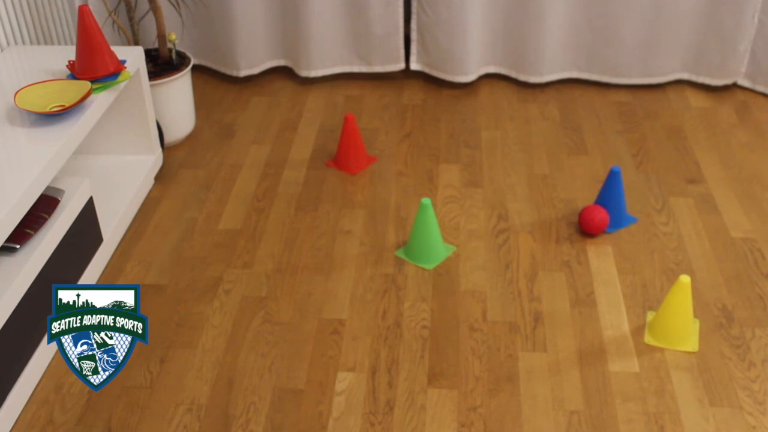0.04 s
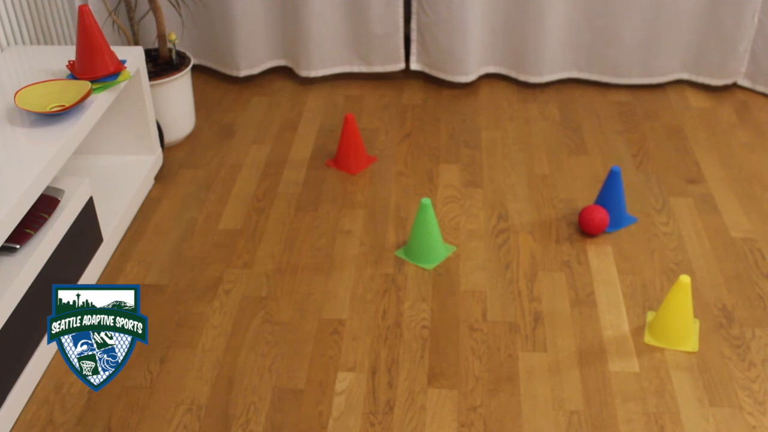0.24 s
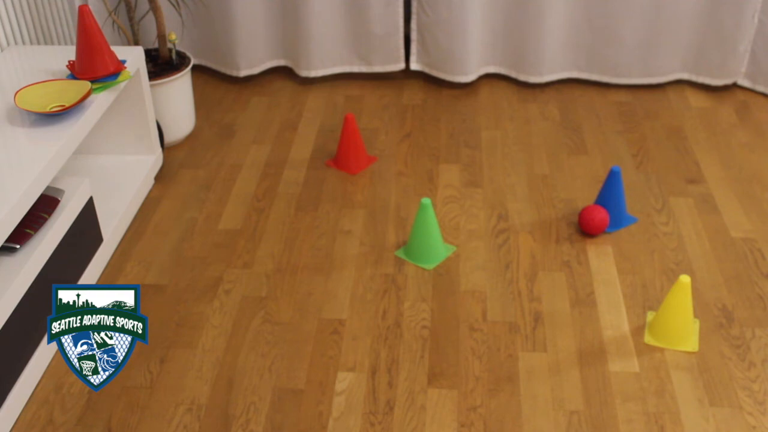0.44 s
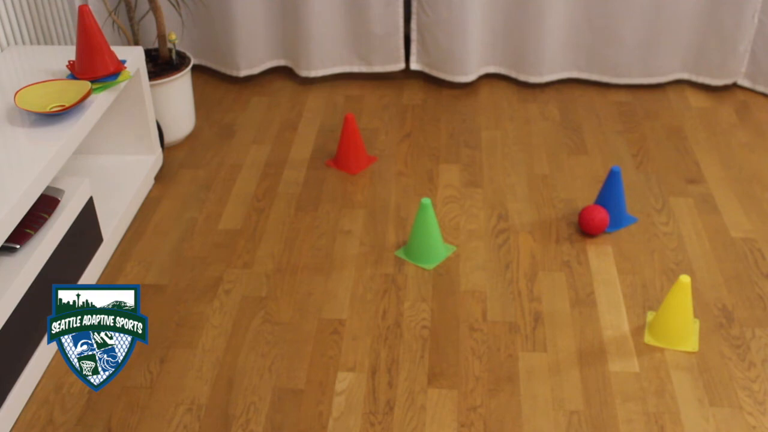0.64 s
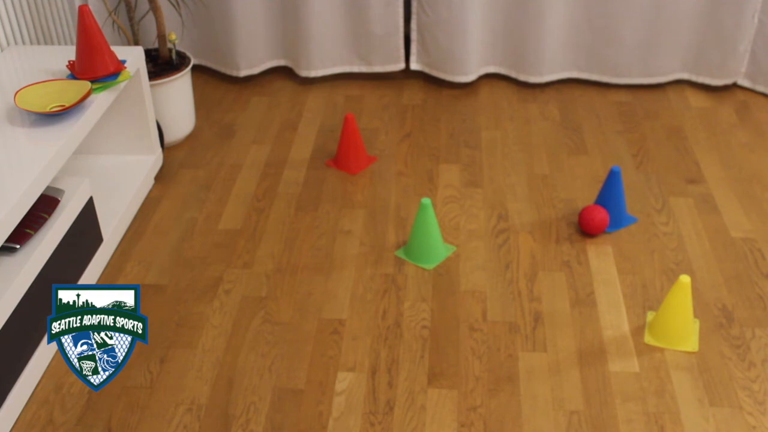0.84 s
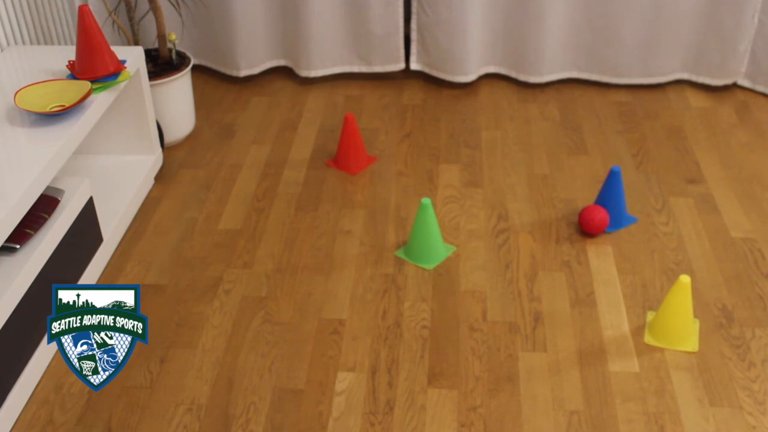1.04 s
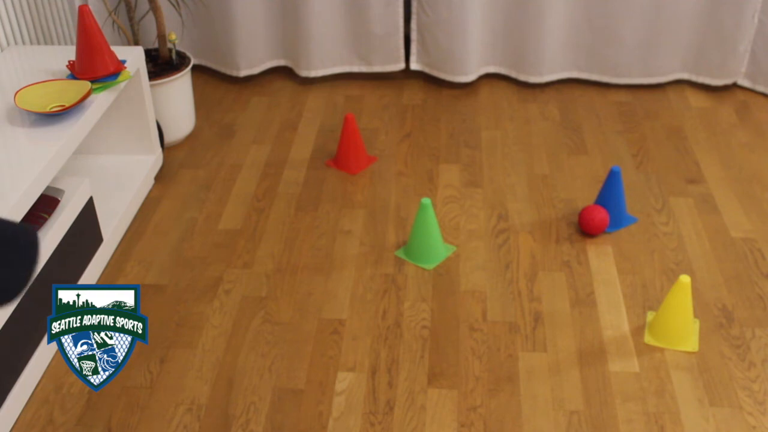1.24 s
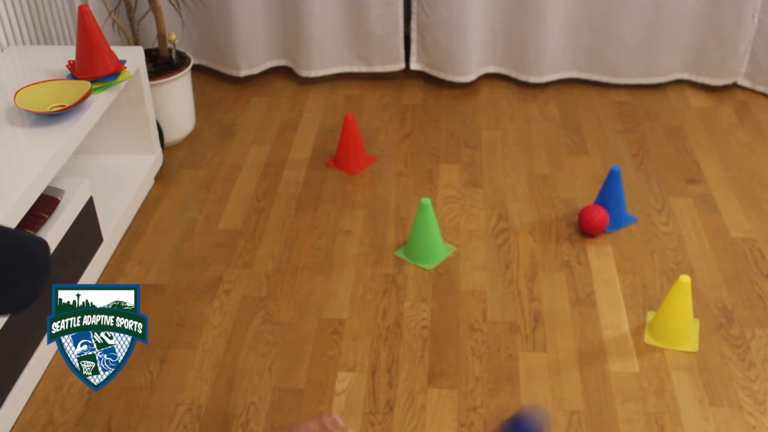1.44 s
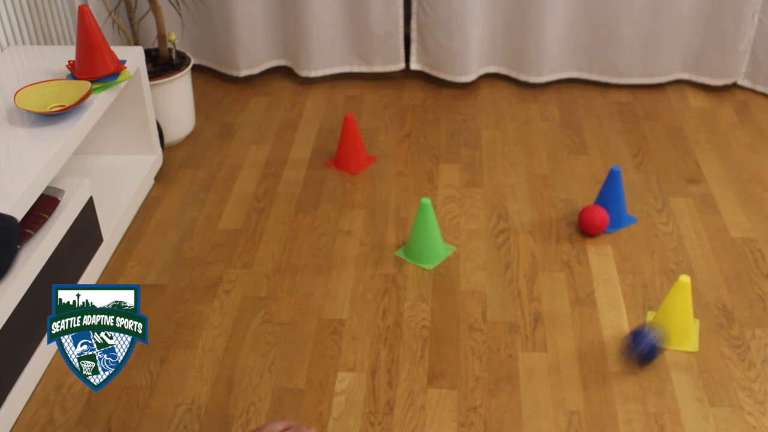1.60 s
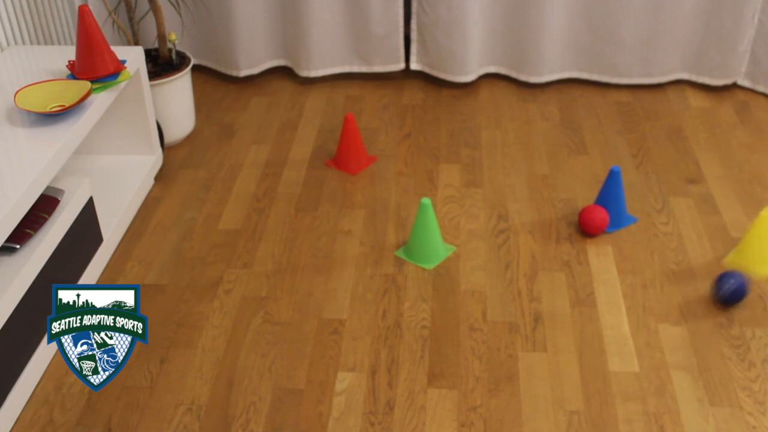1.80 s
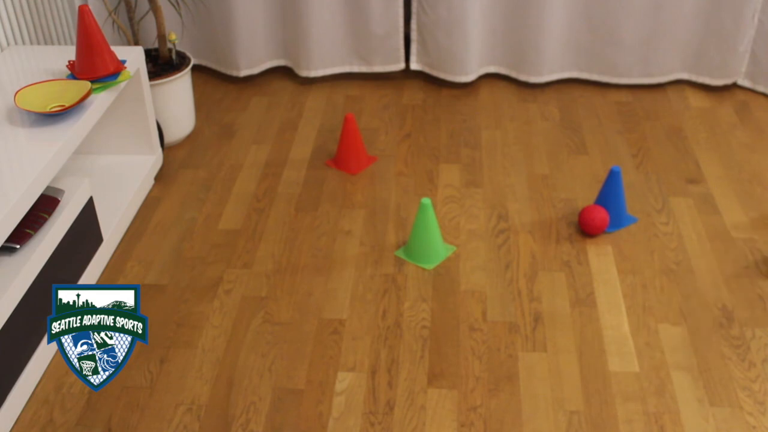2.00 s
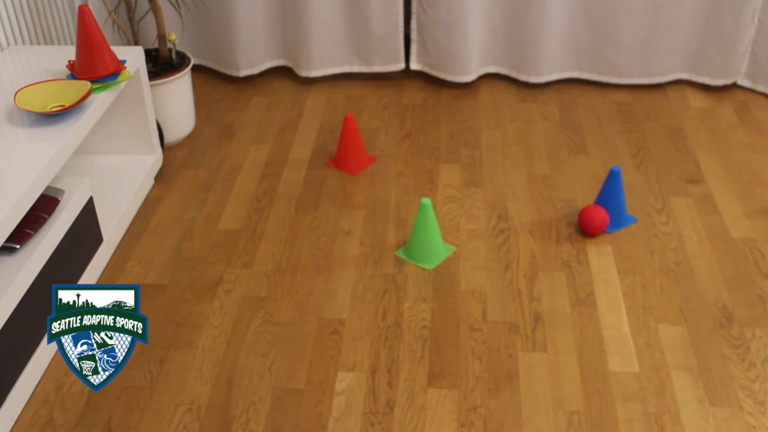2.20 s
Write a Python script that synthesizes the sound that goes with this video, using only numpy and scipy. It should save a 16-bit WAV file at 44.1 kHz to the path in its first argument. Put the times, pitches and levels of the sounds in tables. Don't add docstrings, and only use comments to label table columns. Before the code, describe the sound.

In a furnished room, close and clear, a small dry snap, soft sleeve rustle and light footfall precede a ball landing on wooden boards, then a loud hollow plastic clack, clattering, scraping and low rolling rumble.

```python
import sys
import numpy as np
from scipy import signal
from scipy.fft import rfft, irfft
from scipy.io import wavfile

SR = 44100
rng = np.random.default_rng(int(sys.argv[2]) if len(sys.argv) > 2 else 0)


def amplitude_ratio(level_db):
    exponent = np.asarray(level_db, float) / 20
    return 10 ** exponent


def persist_wave(psi):
    counts = np.round(np.clip(psi, -1, 1) * 32767).astype(np.int16)
    wavfile.write(sys.argv[1], SR, np.atleast_2d(counts).T)


N = 99357
TIME = np.arange(N) / SR


def rms_one(x):
    return x / np.sqrt(np.mean(x ** 2) + 1e-20)


def filtered(x, order, hz, kind="low"):
    return signal.sosfilt(signal.butter(order, hz, kind, fs=SR, output="sos"), x)


def level(rows):
    s, db = np.transpose(rows)
    fade_in = np.clip((TIME - s[0]) / 0.0043, 0, 1)
    fade_out = np.clip((s[-1] + 0.029 - TIME) / 0.0097, 0, 1)
    return amplitude_ratio(np.interp(TIME, s, db)) * fade_in * fade_out


def at_hz(points, hz):
    p = np.array(points)
    return np.interp(np.log(np.maximum(hz, 1)), np.log(p[:, 0]), p[:, 1])


def coloured(spectrum):
    hz = np.arange(N // 2 + 1) * SR / N
    gain = amplitude_ratio(at_hz(spectrum, hz)) * (hz > 0.8 * spectrum[0][0])
    return rms_one(irfft(rfft(rng.standard_normal(N)) * gain, N))


def drift(rate_hz):
    r = np.exp(-2 * np.pi * rate_hz / SR)
    return rms_one(signal.lfilter([1], [1, -2 * r, r * r], rng.standard_normal(N + SR))[SR:])


def ring(x, hz, t60):
    r, w = amplitude_ratio(-60 / (t60 * SR)), 2 * np.pi * hz / SR
    return signal.lfilter([0, np.sin(w)], [1, -2 * r * np.cos(w), r * r], x + 1e-18)


def clicks(s, gains):
    out = np.zeros(N)
    np.add.at(out, (np.asarray(s) * SR).astype(int), gains)
    return out


def grains(per_s):
    sizes = amplitude_ratio(2.5 * np.minimum(rng.exponential(1, N), 4)) * rng.choice([-1, 1], N)
    return sizes * (rng.random(N) < per_s / SR)


def boards(force, modes):
    rung = sum(amplitude_ratio(db) * ring(force, hz, t60) for hz, db, t60 in modes)
    return filtered(rung, 3, 170, "high")


# start in seconds, level in dB, contact cut-off in Hz, direction [signed gain].
BLOW_EVENTS = [(1.183, -23.5, 900, -0.27), (1.1910, -20, 2500, 0.17), (1.1960, -22.5, 295, -0.73),
               (1.225, -33, 900, 0.53), (1.255, -23.5, 290, -0.52), (1.4793, -21.5, 1550, 0.51),
               (1.4860, -23.5, 1150, 0.45), (1.517, -29.5, 600, -1.2), (1.6070, -35.5, 780, -0.42),
               (1.6770, -13.5, 2030, -0.62), (1.6830, -16, 1500, 0.6), (1.6884, -15.5, 1500, 0.38)]
# frequency in Hz, level in dB, t60 in seconds.
BOARD_MODES = [(127, -32, .1), (198, -33, .06), (286, -6, 0.03), (350, 12, 0.017), (410, -0.5, 0.036),
               (505, 7, 0.034), (645, 1, 0.019), (690, 2, 0.019), (900, -26, 0.018)]


def blows():
    force = np.zeros(N)
    for s, db, contact_hz, way in BLOW_EVENTS:
        force = force + filtered(clicks([s], way * amplitude_ratio(db)), 2, contact_hz)
    floor = amplitude_ratio(-10.0) * boards(force, BOARD_MODES)
    direct = amplitude_ratio(-17) * filtered(force, 2, 300, "high")
    ticks = np.diff(clicks([1.4790, 1.6770], -amplitude_ratio([-26, -17])), prepend=0)
    crack = 0
    for s, hz, db in [(1.1870, 1900, -30), (1.6772, 1400, -14)]:
        crack = crack + ring(clicks([s], -amplitude_ratio(db)), hz, 2 / hz)
    return floor + direct + ticks + crack


# frequency in Hz, level in dB per Hz.
FRICTION_SPECTRUM = [(350, -4.5), (600, -11), (1410, -9.5), (1760, -12.5), (1910, -10), (3380, -9.5),
                     (15500, -25)]


def friction():
    return coloured(FRICTION_SPECTRUM)


# start in seconds, rise in seconds, fall in seconds,
# level in dB.
SKID_EVENTS = [
    (1.186, 0.0022, 0.03, -52),
    (1.2800, 0.013, 0.096, -53.5),
    (1.476, 0.0082, 0.04, -34),
    (1.599, 0.024, 0.019, -36.5),
    (1.676, 0.012, 0.046, -27.5),
]


def skids():
    shape = 0
    for s, rise, fall, db in SKID_EVENTS:
        dying = np.exp(-np.maximum(TIME - s - rise, 0) / fall)
        shape = shape + amplitude_ratio(db) * np.clip((TIME - s) / rise, 0, 1) * dying
    return shape * friction() * amplitude_ratio(1.2 * drift(180))


# time in seconds, level in dB.
ROLL_CURVE = [(1.75, -13), (1.766, -32), (1.882, -31), (1.896, -38), (1.92, -27.5), (1.938, -30.5),
              (2.086, -28.5), (2.192, -44), (2.25, -30)]
# frequency in Hz, level in dB, t60 in seconds.
RUMBLE_MODES = [(188, 1, 0.036), (208, 1, 0.26), (264, -17, 0.098), (287, -6, 0.51), (373.3, -0.5, 0.18),
                (496.6, -5.5, 0.25), (550, -31, 0.067)]


def roll():
    bumps = grains(per_s=740) * amplitude_ratio(2 * drift(42))
    return level(ROLL_CURVE) * amplitude_ratio(-9) * rms_one(boards(bumps, RUMBLE_MODES))


def joist_sway():
    landing_s = BLOW_EVENTS[5][0]
    return ring(clicks([landing_s], amplitude_ratio(-50)), 34.6, 2.3)


# resonance in Hz, width in Hz, level in dB.
SHELL_MODES = [(1158, 68, -17), (1370, 170, -13), (1700, 340, 1.5), (1940, 480, 2), (2500, 480, -0.5),
               (3010, 730, -3.5), (4320, 200, -17), (4620, 950, -7)]


def shell(force, wander_db=0):
    out = 0
    for k, (hz, width, db) in enumerate(SHELL_MODES):
        if wander_db:
            db = db + wander_db * drift(17.0)
        out = out + (-1) ** k * amplitude_ratio(db) * ring(force, hz, np.log(1000) / np.pi / width)
    return out


# start in seconds, level in dB,
# note in Hz, t60 in seconds.
CONE_KNOCKS = [(1.612, -40, 1787, 0.3), (1.681, -24, 1230, 0.0084), (1.688, -26, 1807, 0.1),
               (1.6950, -21, 1940, 0.081), (1.7040, -28, 2070, 0.032), (1.71, -19.5, 1700, 0.027),
               (1.7230, -26, 2017, 0.052), (1.738, -36, 2000, 0.023), (1.781, -18, 2020, 0.011),
               (1.844, -37, 2520, 0.029), (1.855, -39.5, 1820, .06), (1.8615, -34, 1720, 0.016),
               (1.898, -43, 1770, 0.021), (1.925, -50, 1630, 0.025), (1.9515, -36, 1890, 0.021),
               (1.979, -27, 1770, .03), (2.04, -34, 1780, .03), (2.048, -28, 2900, 0.027),
               (2.077, -45, 1810, 0.053), (2.1, -35, 1605, 0.042), (2.117, -33, 1560, .05),
               (1.963, -33, 1362, 0.15), (1.967, -29, 1770, 0.054), (1.977, -30, 4320, 0.02),
               (1.9960, -27.5, 1700, 0.028), (2.0100, -27.5, 1905, 0.031), (2.044, -32, 2900, 0.026),
               (2.082, -29, 2655, 0.038), (2.087, -33, 2913, 0.044), (2.092, -31.5, 3100, 0.025),
               (2.1870, -38.5, 1900, .04)]


def cone_knocks():
    s, db, _, _ = np.transpose(CONE_KNOCKS)
    wall = filtered(shell(clicks(s, amplitude_ratio(db - 4.5))), 2, 800, "high")
    notes = sum(ring(clicks([at], amplitude_ratio(d)), hz, t60) for at, d, hz, t60 in CONE_KNOCKS)
    return amplitude_ratio(1.0) * (wall + notes)


# start in seconds, level in dB.
BASE_SLAPS = [(1.6943, -7.5), (1.7034, -17), (1.7072, -7), (1.7105, -11), (1.7217, -14), (1.7255, -13),
              (1.7440, -25.5), (1.799, -21), (1.823, -20), (1.865, -19), (1.915, -23.5), (2.0740, -22)]
# frequency in Hz, level in dB, t60 in seconds.
HOLLOW_MODES = [(216, 0, 0.04), (266.4, 0, 0.072), (308, 2, 0.055), (349, -7, 0.046), (416, -1.5, 0.13),
                (544, -16.5, 0.056), (600, -20, 0.05), (740, -28, 0.062), (980, -16, 0.036)]


def cone_slaps():
    s, db = np.transpose(BASE_SLAPS)
    return boards(clicks(s, -amplitude_ratio(db - 10)), HOLLOW_MODES)


# time in seconds, level in dB.
SCRAPE_CURVE = [(1.69, -52), (1.72, -39), (1.80, -33.5), (1.83, -36.5), (1.87, -35.5), (1.93, -36),
                (1.975, -32.5), (2.06, -38), (2.09, -36), (2.25, -46)]


def cone_scrape():
    contacts = grains(per_s=1500) * amplitude_ratio(1.8 * drift(58))
    rim = filtered(rms_one(shell(contacts, wander_db=1.5)), 2, 800, "high")
    hiss_db = 3.5 - 16.5 * np.maximum(TIME - CONE_KNOCKS[0][0], 0)
    return level(SCRAPE_CURVE) * amplitude_ratio(-4.5) * (rim + amplitude_ratio(hiss_db) * friction())


# start in
# seconds, level in dB, note in Hz, t60 in seconds.
BOOM_EVENTS = [(.2, -44, 133, 0.24), (0.609, -46, 122, 0.24), (1.041, -46.5, 177, 0.26),
               (1.187, -41.5, 100.3, 0.34), (1.186, -30, 466, 0.083), (1.239, -44, 76, 0.22),
               (1.688, -33.5, 121.8, 0.54), (1.679, -36, 87, 0.17), (1.4858, -25.5, 363, 0.11),
               (1.52, -24, 341, 0.055), (1.694, -11, 401, .1), (1.703, -8.5, 270, 0.18),
               (1.7181, -12.5, 290.4, 0.16), (1.742, -13.5, 327, .09), (1.76, -28, 286, .15),
               (1.79, -16, 256.1, 0.24), (1.816, -21, 268, 0.13), (1.857, -26, 275, 0.14),
               (1.872, -32, 268, 0.079), (1.907, -25, 290.6, 0.18), (1.94, -30, 207.4, 0.37),
               (1.952, -28.5, 294, 0.16), (1.989, -40, 213, .3), (2.02, -27.5, 208, 0.45),
               (2.03, -32, 293, .2), (2.065, -32.5, 297, 0.32), (2.071, -39, 204, 0.18),
               (2.105, -26, 289.3, 0.24), (2.13, -41, 203.2, 0.37), (2.16, -27, 301, 0.11),
               (2.186, -34, 214.4, 0.43)]


def booms():
    out = 0
    for s, db, hz, t60 in BOOM_EVENTS:
        t = np.maximum(TIME - s, 0)
        swell = 1 - np.exp(-t / 0.0041)
        out = out + amplitude_ratio(db - 60 * t / t60) * swell * np.sin(2 * np.pi * hz * t)
    return out


SNAP_TIMES = .1819, .1826, .1839, .1855
SNAP_LEVELS = -9, -14.5, -7.5, -11.5
SNAP_TICK_LEVELS = -22, -27, -19, -32
# frequency in Hz, level in dB, t60 in seconds.
SNAP_BODY = [(304, -7.5, 0.024), (600, -9, 0.013), (1280, -18.5, 0.022), (2030, -11, 0.011),
             (2500, -15.5, 0.02), (2900, -25, 0.015), (3910, -15.5, 0.017), (5120, -8.5, 0.012),
             (6300, -12, 0.0073)]


def snap():
    force = clicks(SNAP_TIMES, -amplitude_ratio(SNAP_LEVELS))
    body = boards(amplitude_ratio(-10) * force, SNAP_BODY)
    burst = np.convolve(np.abs(force), np.exp(-np.arange(200) / 18))[:N] * rng.standard_normal(N)
    crack = amplitude_ratio(-6) * filtered(burst, 1, [1500, 4500], "band")
    touches = clicks(SNAP_TIMES, amplitude_ratio(SNAP_TICK_LEVELS))
    tick = np.diff(np.convolve(touches, [0.5, 1, 0.5])[:N], prepend=0)
    pop = ring(clicks([0.18383], -amplitude_ratio(-10)), 2600, 4 / 2600)
    far = filtered(clicks(SNAP_TIMES[2:3], amplitude_ratio(6)), 1, [400, 4800], "band")
    return body + crack - tick + pop, far + amplitude_ratio(-2.5) * body


# time in seconds, level in dB.
SLIDE_CURVE = [(0.54, -77), (0.568, -55.5), (0.636, -52.5), (0.844, -54.5), (0.864, -50.5), (1.132, -51),
               (1.15, -80)]
# frequency in Hz, level in dB.
CLOTH_SPECTRUM = [(500, -38), (900, -5), (2200, -5), (3800, -12.5), (5500, -8), (6800, -11), (8000, -16),
                  (15500, -16.5)]


def cloth():
    rub_hz, rub_t60 = 1510, 2 / 487
    rub = rms_one(ring(ring(rng.standard_normal(N), rub_hz, rub_t60), rub_hz, rub_t60))
    slide = level(SLIDE_CURVE) * amplitude_ratio(3.0 + 1.2 * drift(26)) * coloured(CLOTH_SPECTRUM)
    rubbing = level([(0.855, -53.5), (1.0, -50.5), (1.12, -53.5)]) * amplitude_ratio(3.0 * drift(16))
    return slide + rubbing * rub


def heel_thud():
    return ring(clicks([0.93], amplitude_ratio(-43)), 99, 0.28)


# time in seconds, level in dB.
SHIFT_CURVE = [(.58, -58), (.64, -56), (.8, -61), (.95, -50.5), (1.1, -63), (1.2, -51.5), (1.3, -52.5),
               (1.4, -47.5), (1.47, -51)]
# frequency in Hz, level in dB per Hz.
CREAK_SPECTRUM = [(60, -8), (100, -11), (170, -7.5), (280, -0.5), (600, -9), (1000, -11), (1600, -33)]
# start in seconds, length in seconds, pitch in Hz, level in dB.
SOLE_SQUEAKS = [
    (1.186, .015, 14200, -62),
    (1.2, .06, 13700, -66),
    (1.383, .035, 13500, -62),
    (1.432, .03, 13300, -58),
]


def feet():
    white, squeak = rng.standard_normal(N), 0
    for s, long, hz, db in SOLE_SQUEAKS:
        swell = np.sin(np.pi * np.clip((TIME - s) / long, 0, 1))
        squeak = squeak + amplitude_ratio(db) * swell * rms_one(ring(white, hz, 2 / 900))
    return level(SHIFT_CURVE) * amplitude_ratio(2.9 * drift(10)) * coloured(CREAK_SPECTRUM) + squeak


# frequency in Hz, level in dB rms.
HUM_TONES = [(55.5, -56.5), (555, -59), (3550, -68.5)]
# frequency in Hz, level in dB.
HISS_SPECTRUM = [(70, -45), (90, -7), (125, -1), (160, -6.5), (240, -1), (560, -10), (1300, -15),
                 (15500, -31)]


def background():
    hum = 0
    for (hz, db), waver_db in zip(HUM_TONES, (0.5, 3, 4)):
        hum = hum + np.sqrt(2) * amplitude_ratio(db + waver_db * drift(1.65)) * np.sin(2 * np.pi * hz * TIME)
    return amplitude_ratio(-49.5 + 0.7 * drift(0.64)) * coloured(HISS_SPECTRUM) + hum


# frequency in Hz, t60 in seconds.
ROOM_DECAY = [(100, 0.24), (500, 0.53), (2000, 0.57), (6000, 0.55), (15000, 0.29)]
# frequency in Hz, level in dB.
ROOM_TONE = [(100, -1), (260, -1), (420, 1.5), (1000, 3), (4000, 0.5), (15000, 0)]


def room(x):
    t, tail = np.arange(SR) / SR, 0
    edges = 70 * 2 ** np.arange(0, 8.1, 0.5)
    white = rng.standard_normal((2, SR))
    for k, (low, high) in enumerate(zip(edges, edges[1:])):
        band = filtered(white[k % 2], 2, [low, high], "band")
        t60 = at_hz(ROOM_DECAY, np.sqrt(low * high))
        tail = tail + band * amplitude_ratio(at_hz(ROOM_TONE, low) - 60 * t / t60)
    tail = tail * np.clip(t / 0.0015 - 1, 0, 1)
    return amplitude_ratio(-4) * signal.fftconvolve(x, tail / np.sqrt(np.sum(tail ** 2)))[:N]


def scene():
    rumble = roll()
    snap_near, snap_far = snap()
    cone = cone_slaps() + cone_scrape()
    dry = blows() + rumble + cone + skids() + cloth() + heel_thud()
    knocks, boom = cone_knocks(), booms()
    wet = room(dry + snap_far + amplitude_ratio(-3) * knocks + amplitude_ratio(-14) * boom)
    return (dry + snap_near + knocks + boom + wet + joist_sway() + background() + feet())[None]


def low_pass(x):
    return signal.sosfilt(signal.butter(12, 16810, fs=SR, output="sos"), x)


def record(dry):
    lowpass = signal.ellip(10, 0.1, 50, 15800, fs=SR, output="sos")
    cut = signal.sosfiltfilt(lowpass, dry)
    finished = cut + amplitude_ratio(-38) * (dry - cut) + 0.001
    return low_pass(finished)


dry = scene()
out = record(dry)
persist_wave(out)
```